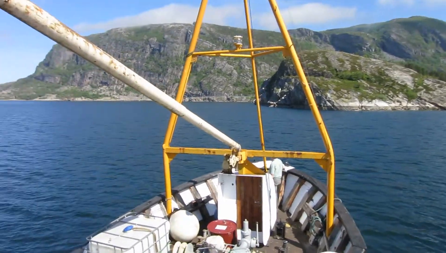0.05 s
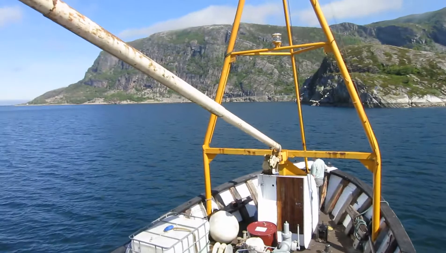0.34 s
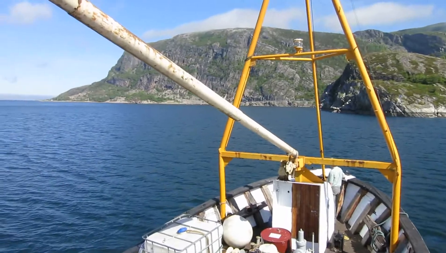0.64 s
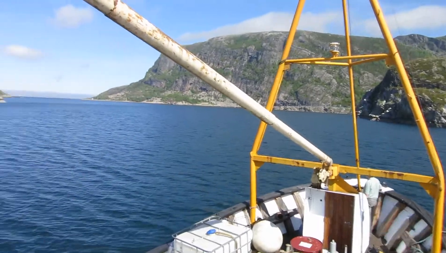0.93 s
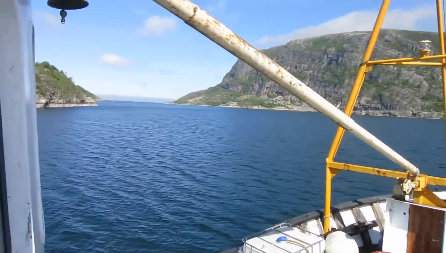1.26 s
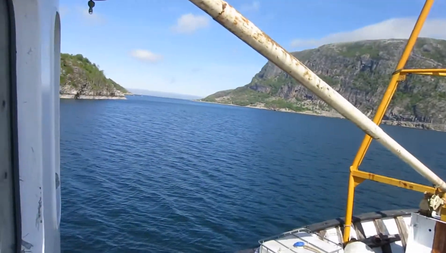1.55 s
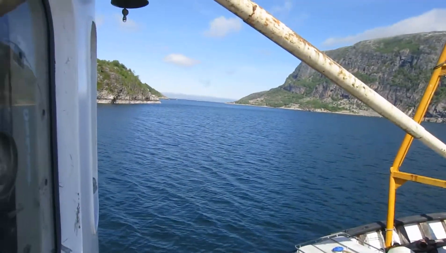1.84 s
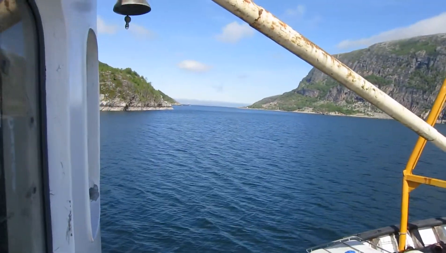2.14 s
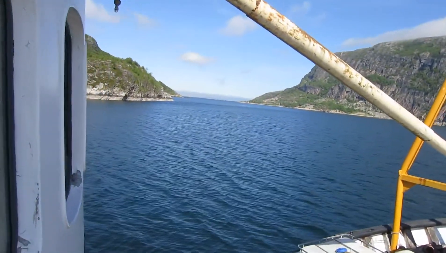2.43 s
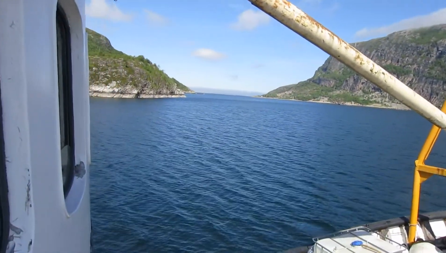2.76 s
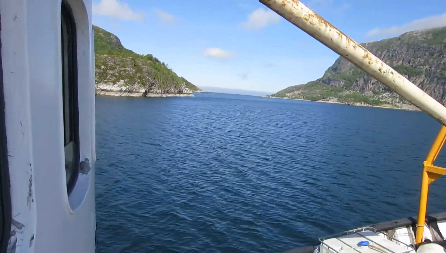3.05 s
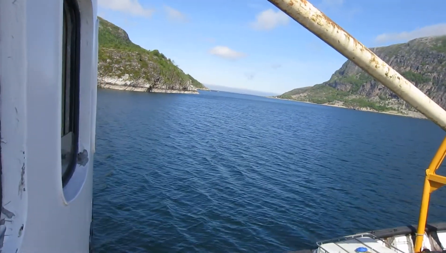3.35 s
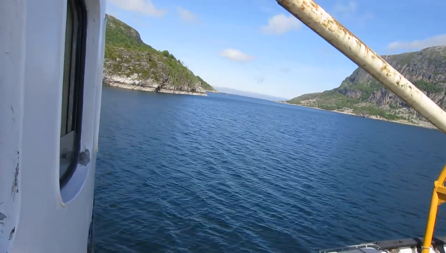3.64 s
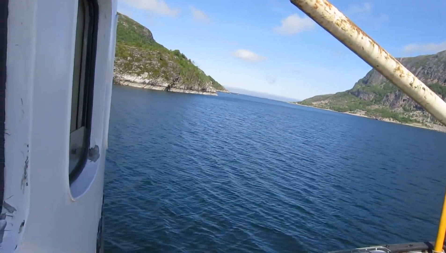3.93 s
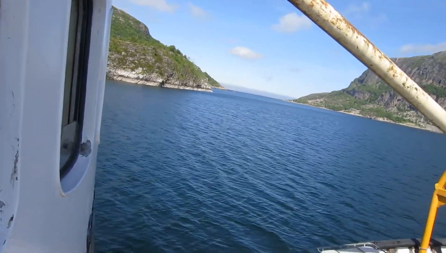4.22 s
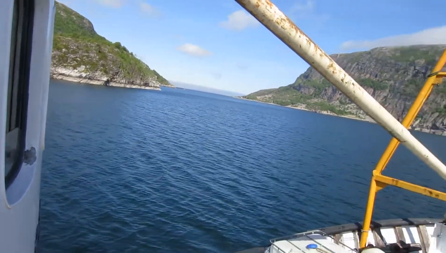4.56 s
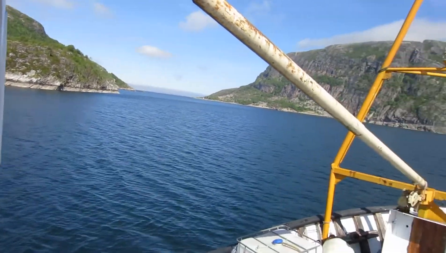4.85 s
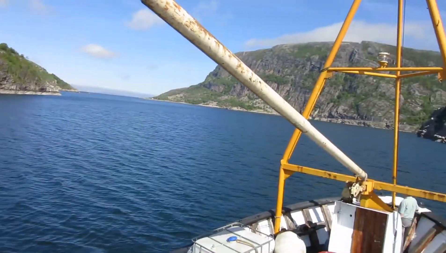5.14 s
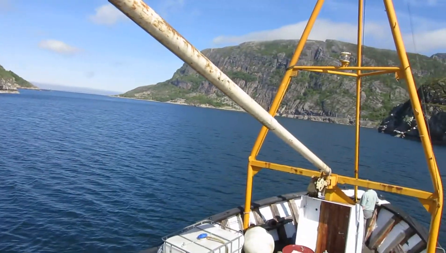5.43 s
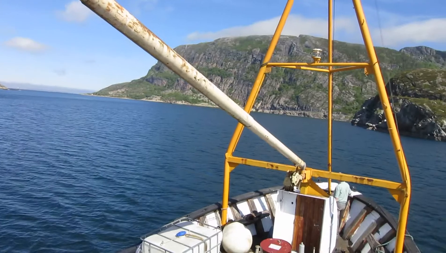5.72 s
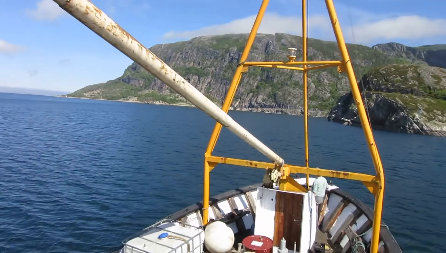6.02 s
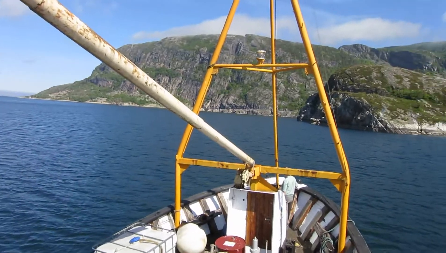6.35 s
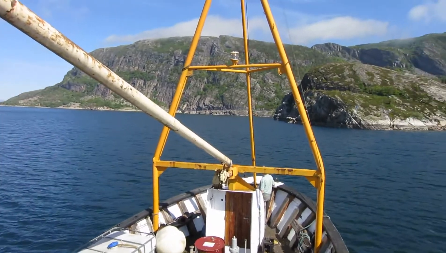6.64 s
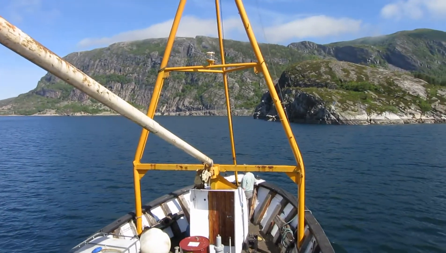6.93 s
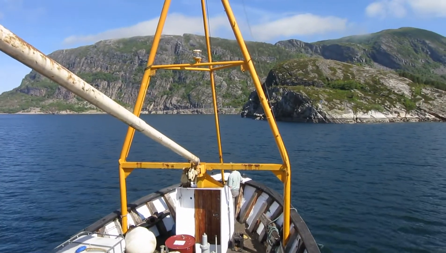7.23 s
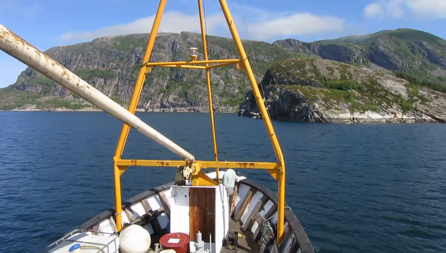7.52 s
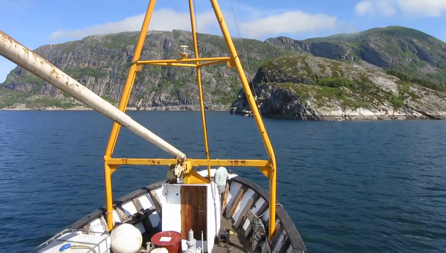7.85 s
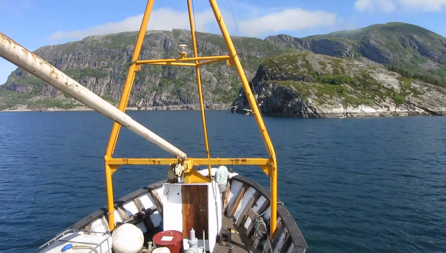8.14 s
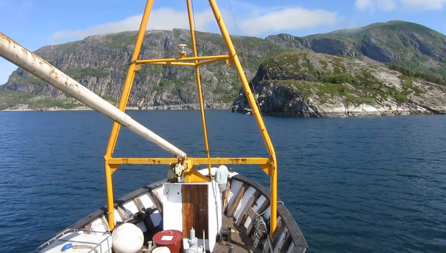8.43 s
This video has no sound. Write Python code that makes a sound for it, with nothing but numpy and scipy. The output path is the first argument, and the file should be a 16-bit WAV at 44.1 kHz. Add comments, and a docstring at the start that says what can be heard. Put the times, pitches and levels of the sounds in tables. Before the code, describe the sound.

A slow diesel engine throbs steadily through a wooden boat, with valve chirps and taps repeating about four times a second over a machine hum. Water hisses softly along the hull. It is heard from the deck on a stereo microphone whose right side is muffled. During the first second, fingers knock and creak on the casing, hardest at 0.8 seconds, followed by soft rubbing until about 2 seconds. The engine swells from 1.6 seconds and is loudest between 3 and 5.5, with the water surging near 3.8. From 5.6 to 7 seconds come sharp handling knocks, small clinks and a thump at 6.2, mostly on the right, and the engine and water drop suddenly in level. From 7 seconds to the end, near 8.7, dry engine taps stand out over the quieter throb, the hiss and a faint rumble of wind.

```python
"""A slow three-cylinder diesel throbs through the hull of a wooden boat under way on calm water.
Its valve gear chirps and taps over the hum of a faster auxiliary machine; the bow wave hisses.
Heard from the deck beside the wheelhouse, on a camera's stereo microphone in a light head wind.
The camera swings towards the wheelhouse and back. A finger covers and rubs the right port and knocks
on the casing; the deck sound ducks at three knocks. Near the end, dry engine taps stand out."""
import sys
import numpy as np
from scipy import signal
from scipy.fft import rfft, irfft, next_fast_len
from scipy.io import wavfile
from scipy.ndimage import uniform_filter1d

SR = 44100
rng = np.random.default_rng(int(sys.argv[2]) if len(sys.argv) > 2 else 0)


def persist_wave(psi):
    """Save psi, clipped to +-1, as 16-bit WAV."""
    counts = np.round(np.clip(psi, -1, 1) * 32767).astype(np.int16)
    wavfile.write(sys.argv[1], SR, np.atleast_2d(counts).T)


N = 382788
TIME = np.arange(N) / SR
CYCLE_S, CYCLE_START_S = .23123, 1.978  # one round of the diesel's three firings
IN_CYCLE = (TIME - CYCLE_START_S) % CYCLE_S


def amp(db):
    return 10 ** (np.asarray(db) / 20)

def unit_rms(x):
    return x / np.sqrt(np.mean(x ** 2) + 1e-20)

def over_time(points):
    return np.interp(TIME, *np.transpose(points))

def at_pitch(points, hz):
    pitches, values = np.transpose(points)
    return np.interp(np.log(hz + 1), np.log(pitches + 1), values)

def coloured(x, spectrum):
    """Filters x by rows of pitch_hz, gain_db."""
    size = next_fast_len(x.shape[-1])
    gain = amp(at_pitch(spectrum, np.fft.rfftfreq(size, 1 / SR)))
    return irfft(rfft(x, size) * gain, size)[..., :x.shape[-1]]

def drift(hz):
    """Random wander of unit size, changing about hz times a second."""
    return unit_rms(np.interp(TIME * hz, np.arange(2000), rng.standard_normal(2000)))

def bursts(per_s, decay_s):
    """Random pulses that start at once and die away."""
    starts = (rng.random(N) < per_s / SR) * rng.uniform(0.12, 1, N)
    return signal.lfilter([1], [1, -np.exp(-1 / (decay_s * SR))], starts)

def swells(rows):
    """One smooth rise and fall for each row."""
    return sum(amp(db) * np.exp(-((TIME - s) / half_s) ** 2) for s, db, half_s in rows)

def ports(x, lead_s):
    """The microphone's left port hears the sound a little earlier than the right."""
    return np.array([np.interp(TIME + lead_s, TIME, x), x])


# The diesel's firings, one row a cylinder: cycle_time_s, strength_db, decay_s
FIRINGS = [(.008, -2, 0.011), (.090, -7, 0.022), (.165, -5, 0.01)]

def throb(cycle_s, rest, rise_s=0.007):
    """Pressure over the cycle: each firing swells quickly and dies away above a steady rest."""
    pressure = 0
    for start_s, db, decay_s in FIRINGS:
        age = (cycle_s - start_s) % CYCLE_S
        pressure += amp(db) * (1 - np.exp(-age / rise_s)) * np.exp(-age / decay_s)
    return rest + pressure

# The hull's answer to the firings, heard on deck: pitch_hz, gain_db
HULL = [(15, -42), (45, -8.5), (70, -4), (110, -5.5), (180, 1.5), (235, -1), (300, -4), (332, -5.5),
        (365, -18.5), (560, -31.5), (660, -13.5), (760, -53), (1500, -53), (4000, -78)]

def diesel(level_db=-20.5, turbulent_db=-2.5, rest=0.26, uneven_db=0.4, apart_db=-10):
    """Firings shake the hull: much the same rumble every cycle, plus turbulence that never repeats."""
    cycle_s = np.arange(round(CYCLE_S * SR)) / SR
    harmonics = rfft(throb(cycle_s, rest) * rng.standard_normal(len(cycle_s)))
    one_cycle = unit_rms(irfft(harmonics / abs(harmonics), len(cycle_s)))
    repeated = np.interp(IN_CYCLE, cycle_s, one_cycle)
    turbulent = unit_rms(throb(IN_CYCLE, rest) * rng.standard_normal(N))
    blows = (repeated + amp(turbulent_db) * turbulent) * amp(uneven_db * drift(21))
    stereo = ports(blows, 0.000096) + amp(apart_db) * rng.standard_normal((2, N))
    return amp(level_db) * unit_rms(coloured(stereo, HULL))

# The diesel's rumble as the microphone swings to the wheelhouse and back: time_s, gain_db
WHEELHOUSE_SWING = [(0, -15.5), (.55, -11.5), (1.6, -11), (3.2, 1.5), (4.5, 1), (5.5, 1.5), (6.3, -2),
                    (7.1, -12.5), (8.68, -13)]

def nearness(share=1):
    """Gain near the wheelhouse; sounds with a smaller share of the swing carry further over the deck."""
    return amp(share * over_time(WHEELHOUSE_SWING))

def shaft_tones(rows, shaft_hz, waver_db, waver_turns, spread_turns):
    """Wavering multiples of a shaft speed; the less their phases spread, the more they pulse."""
    out = np.zeros(N)
    for multiple, db in rows:
        turns = multiple * shaft_hz * TIME + spread_turns * rng.random() + waver_turns * drift(2.45)
        out += amp(db + waver_db * drift(5)) * np.sin(2 * np.pi * turns)
    return out

# Harmonics of the auxiliary machine: speed_multiple, level_db
HUM_HARMONICS = [(2, -29), (3, -23), (4, -16), (5, -29), (6, -26), (7, -27), (8, -31.5), (9, -39),
                 (11, -37.5), (12, -41.5), (13, -46.5), (14, -51)]

def auxiliary_hum(shaft_hz=37.318):
    """The faster machine hums at multiples of its speed."""
    hum = shaft_tones(HUM_HARMONICS, shaft_hz, waver_db=1.0, waver_turns=0.027, spread_turns=0.49)
    return ports(hum, 0.00013)

# Harmonics of the crank: cycle_rate_multiple, level_db
CRANK_HARMONICS = [(6, -40), (9, -39.5), (12, -55), (15, -42), (18, -30), (29, -30), (47, -36.5)]

def crank_shake():
    """The turning crank shakes the boat steadily, in step with the engine cycle."""
    shake = shaft_tones(CRANK_HARMONICS, 1 / CYCLE_S, waver_db=4.0, waver_turns=0.016, spread_turns=0.77)
    return ports(shake, 0.000093)

# How far a ring follows the swing; higher ones fade less with distance: pitch_hz, share
SWING_SHARE = [(300, .9), (650, .68), (1300, .46)]

def cycle_rings(rows, uneven_db, scatter, slip_turns, rough, rise):
    """Short gliding tones at set angles of the cycle; rise is swell time as a share of fade time."""
    out = np.zeros(N)
    for peak_s, hz, db, fade_s, octaves_per_s in rows:
        cycles = (TIME - CYCLE_START_S - peak_s) / CYCLE_S
        nearest = np.round(cycles).astype(int)
        age = (cycles - nearest) * CYCLE_S
        strength, detune, slip = rng.standard_normal((64, 3))[nearest].T  # new in each cycle
        glided_s = age + np.log(2) * octaves_per_s * age ** 2 / 2
        turns = hz * (1 + scatter * detune) * glided_s + slip_turns * slip
        envelope = np.exp(-(age / np.where(age < 0, rise * fade_s, fade_s)) ** 2)
        gain = amp(db + uneven_db * strength) * nearness(at_pitch(SWING_SHARE, hz))
        out += gain * envelope * np.sin(2 * np.pi * turns)
    return ports(out * (1 + rough * drift(200)), 0.00015)

# Thuds of the hull: cycle_time_s, pitch_hz, level_db, fade_s, glide_octaves_per_s
THUDS = [(.007, 278, -15.5, 0.0055, -5), (.017, 175, -11.5, 0.0055, -17), (.036, 170, -25.5, .006, 2),
         (.096, 112, -19, 0.0065, 0), (.108, 210, -13, .006, -7), (.171, 252, -13.5, 0.0082, -5),
         (.188, 225, -15, 0.012, 3.5)]

def hull_thuds():
    """The wooden hull rings low and briefly with each firing."""
    return cycle_rings(THUDS, uneven_db=0, scatter=0.0077, slip_turns=0.083, rough=0.082, rise=0.81)

# Squeaks of the valve gear: cycle_time_s, pitch_hz, level_db, fade_s, glide_octaves_per_s
SQUEAKS = [(-.003, 644, -22.2, .015, -4.5), (-.002, 1326, -26, .012, 0), (.016, 1335, -38, .014, 0),
           (.001, 1620, -41, .015, 2), (.008, 955, -38, .014, 0), (.085, 1335, -37, .010, 0),
           (.155, 1335, -41, .008, 0), (.159, 651, -25, .015, 1), (.05, 660, -37, .022, 0)]

def valve_squeaks(right_db=-1.4):
    """The valve gear chirps in every cycle, slightly left of centre."""
    chirps = cycle_rings(SQUEAKS, uneven_db=.35, scatter=.01, slip_turns=.25, rough=.2, rise=.45)
    return chirps * amp([[0], [right_db]])

# The engine's rattling metal, heard on deck: pitch_hz, gain_db
CLATTER_COLOUR = [(200, -4), (420, 3), (650, 3.5), (800, -6.5), (1200, -2), (1700, -7.5), (2300, -12),
                  (3200, -26.5), (5000, -35), (12000, -40.5)]

def clatter(level_db=-34, flicker_db=1.5, apart_db=-6):
    """Dense rattle of the engine's metal parts, pulsing with the firings."""
    noise = ports(rng.standard_normal(N), 0.0002) + amp(apart_db) * rng.standard_normal((2, N))
    rattle = noise * throb(IN_CYCLE, rest=1.0) * amp(flicker_db * drift(120))
    return amp(level_db) * unit_rms(coloured(rattle, CLATTER_COLOUR))

# Dry taps of the valve gear: cycle_time_s, level_db, half_length_s, centre_hz
TAPS = [(-.007, -29, .0035, 1100), (.007, -34, .003, 1000), (.044, -38, .005, 1300), (.12, -39, .004, 2300)]

def valve_taps(uneven_db=1):
    """Each tap of the valve gear is a short, dull clack about two octaves wide."""
    out = np.zeros(N)
    for peak_s, db, half_s, hz in TAPS:
        age = (IN_CYCLE - peak_s + CYCLE_S / 2) % CYCLE_S - CYCLE_S / 2
        band = [(hz / 8, -40), (hz / 2, -4), (hz, 0), (2 * hz, -6), (4 * hz, -32), (8 * hz, -60)]
        out += amp(db) * np.exp(-(age / half_s) ** 2) * unit_rms(coloured(rng.standard_normal(N), band))
    return ports(out * amp(uneven_db * drift(4.6)), 0.00022)

# Foam along the hull, heard from the deck: pitch_hz, gain_db
FOAM_COLOUR = [(30, -58), (150, 7.5), (500, 1.5), (1100, 1), (2200, -3), (3300, -8), (4900, -10.5),
               (5800, -14.5), (10000, -16.5), (12000, -20.5), (14000, -33), (15300, -38)]
# The foam's fizz above 4 kHz: time_s, gain_db
FIZZ = [(0, -0.5), (.7, 0), (1.05, -4), (1.5, -6), (1.8, -1), (2.1, -3.5), (5.5, -1.5), (7.5, -0.5),
        (7.58, 2.5), (7.88, 4), (8.03, -1.5), (8.68, 2)]
# Surges added to the steady hiss, relative to it: peak_s, level_db, half_length_s
SURGES = [(3.75, -6, 0.87), (6.7, -14, 0.33)]

def bow_wave(level_db=-37.5, waver_db=0.03, flicker_db=2, drops_db=-10, drops_per_s=120, apart_db=1):
    """Foam hisses along the hull, with single drops and short spits of spray in it."""
    drops = (rng.random(N) < drops_per_s / SR) * rng.standard_normal(N)
    hiss = rng.standard_normal(N) * amp(flicker_db * drift(90)) + amp(drops_db) * unit_rms(drops)
    stereo = ports(hiss, 0.00015) + amp(apart_db) * rng.standard_normal((2, N))
    foam = unit_rms(coloured(stereo, FOAM_COLOUR))
    fizz = coloured(foam, [(2500, -30), (4000, -5), (6500, 0)])
    spray = 0.51 * bursts(per_s=14, decay_s=0.015)
    foam += fizz * (amp(over_time(FIZZ)) - 1 + spray)
    return amp(level_db + waver_db * drift(5.5)) * (1 + swells(SURGES)) * foam

# Head wind right on the microphone: pitch_hz, gain_db
WIND_COLOUR = [(15, -19), (35, -23), (80, -4), (110, 4), (160, -4), (300, -12), (800, -44), (3000, -92)]
# Its gusts: peak_s, level_db, half_length_s
GUSTS = [(0, -39, 0.53), (6.25, -31, 0.3), (8.35, -32, 0.8)]

def head_wind(steady_db=-47, buffet_db=3.0, apart_db=-1):
    """A low, lumpy rumble of air moving past the camera, partly its own at each port."""
    air = rng.standard_normal(N) + amp(apart_db) * rng.standard_normal((2, N))
    strength = (amp(steady_db) + swells(GUSTS)) * amp(buffet_db * drift(13))
    return strength * unit_rms(coloured(air, WIND_COLOUR))

# The covered right port against the open left: pitch_hz, gain_db
COVERED_PORT = [(100, -0.47), (300, -1), (700, -1), (1300, -2.5), (2400, -6), (4300, -11.5), (8000, -18),
                (15000, -25)]

def muffle_right(sound):
    """The finger keeps treble out of the right port throughout."""
    return np.array([sound[0], coloured(sound[1], COVERED_PORT)])

# The casing around the microphone, colouring creaks and knocks: pitch_hz, gain_db
CASING = [(100, 22), (300, 3), (550, 3), (950, -1.5), (1600, -5), (2500, -15), (3900, -29), (6000, -31),
          (10000, -47.5), (15000, -58)]
# Bouts in which the grip shifts: peak_s, level_db, half_length_s
GRIP_SHIFTS = [(.2, -34.5, 0.54), (3, -36.5, 0.4), (5.7, -38.5, 0.72), (8.0, -47.5, 1)]

def grip_creaks(per_s=16, slip_s=0.009, left_db=-14):
    """Small slips of the grip tick in the casing at random, mostly at the right port."""
    ticks = coloured(bursts(per_s, slip_s) * rng.standard_normal(N), CASING)
    ticks = coloured(ticks, [(150, -17.5), (500, 4), (2500, -15.5), (5000, -1)])  # light slips: less bass
    return ports(swells(GRIP_SHIFTS) * unit_rms(ticks), 0.00047) * amp([[left_db], [0]])

# Dry knocks: a finger on the casing, plus late engine taps, roughly one per cycle:
# time_s, level_db, half_length_s, treble_db, lowest_ring_hz
KNOCKS = [(0.026, -19.5, 0.0023, -2, 450), (.188, -24.5, 0.0059, 1, 500), (0.316, -18.5, 0.0019, -3, 740),
          (.337, -27, .002, -6, 700), (0.443, -22, 0.002, -10, 760), (.521, -19.5, 0.0037, -7, 690),
          (.558, -17.5, 0.003, -8, 646), (.613, -18.5, 0.0027, -18, 614), (0.744, -25, 0.0023, 0, 500),
          (0.761, -10, 0.0085, 2, 218), (0.794, -27.5, 0.009, 13, 453), (2.05, -24, 0.0024, 5, 700),
          (5.691, -17, 0.0028, 1, 730), (5.813, -16.5, 0.0036, 9, 593), (5.925, -22, 0.02, -1.5, 198),
          (6.2292, -12.5, 0.0022, 9, 260), (6.373, -16.5, 0.012, -4.5, 212),
          (6.479, -15, 0.0053, -0.5, 271), (6.535, -18, 0.0027, -1, 260), (6.545, -20, 0.009, -2.5, 228),
          (6.957, -31.5, 0.014, 4, 300), (7.027, -16, 0.0005, -3, 278), (7.103, -28.5, 0.001, -10, 326),
          (7.202, -28, 0.0018, -7, 620), (7.292, -29, .0018, -2, 590), (7.42, -33, 0.0015, 3, 1100),
          (7.521, -33, 0.0024, -9, 497), (7.598, -29.5, 0.0017, -6, 500), (7.706, -28.5, 0.0019, -10, 297),
          (7.905, -32.5, 0.0013, 0, 800), (7.978, -23.5, 0.0012, 0, 740), (8.137, -27, 0.0013, 1, 750),
          (8.213, -26.5, 0.002, -1, 690), (8.368, -29, 0.0017, 0, 400), (8.445, -26, 0.0015, -5, 646),
          (8.522, -29, 0.0017, -3, 653), (8.597, -26, 0.0036, 1, 397)]

def dry_knocks(left_db=-9, apart=0.62, ring_q=1.97, lead_s=0.00028):
    """Each knock is a quick burst of noise with its own lowest ring, loudest at the right port."""
    out = np.zeros((2, N))
    t = np.arange(-2048, 2048) / SR
    hz = np.fft.rfftfreq(len(t), 1 / SR)
    for time_s, db, half_s, treble_db, ring_hz in KNOCKS:
        envelope = np.exp(-np.logaddexp(-3 * (t / half_s + 0.37), t / half_s + 0.31))  # sharp onset
        burst = rng.standard_normal((2, len(t))) * envelope
        burst[0] = apart * burst[0] + np.interp(t + lead_s, t, burst[1])
        force = rfft(burst)
        force /= np.sqrt(uniform_filter1d(abs(force) ** 2, size=41, axis=1))  # excites all pitches alike
        ratio = 1j * hz / ring_hz
        resonant_highpass = ratio ** 2 / (ratio ** 2 + ratio / ring_q + 1)
        colour_db = at_pitch(CASING, hz) + at_pitch([(900, 0.0067), (3000, treble_db)], hz)
        knock = irfft(force * resonant_highpass * amp(colour_db)) * amp([[left_db], [0]])
        knock *= amp(db) * np.linalg.norm(envelope / envelope.max()) / np.linalg.norm(knock[1])
        at = round(time_s * SR) + np.arange(len(t)) - len(t) // 2
        inside = (at >= 0) & (at < N)
        out[:, at[inside]] += knock[:, inside]
    return out

# Finger strokes right on the microphone: peak_s, level_db, half_length_s
RUBS = [(.73, -44.5, 0.034), (.89, -48.5, 0.14), (1.3, -54, .16), (1.57, -50, .06), (1.675, -45.5, 0.059),
        (1.79, -44.5, 0.081), (1.87, -45, .025), (5.925, -49, 0.019), (6.92, -50.5, 0.024)]
# Skin on plastic: pitch_hz, gain_db
SKIN_COLOUR = [(300, -23), (1800, 15), (4500, 7.5), (9000, -2), (12000, -15), (15000, -28)]

def finger_rubs(left_db=-14, flicker_db=2.1):
    """Soft hiss of skin sliding across the right port."""
    friction = rng.standard_normal((2, N)) * amp(flicker_db * drift(200))
    return swells(RUBS) * unit_rms(coloured(friction, SKIN_COLOUR)) * amp([[left_db], [0]])

# Dips of the deck sound at three hard knocks: start_s, drop_db, recovery_s
DIPS = [(0.764, 9, 0.58), (5.681, 10, 1.15), (6.225, 11.5, 2.9)]

def level_dips(fall_s=0.022):
    """A gain that drops quickly and creeps back."""
    gain_db = np.zeros(N)
    for start_s, drop_db, recovery_s in DIPS:
        age = np.maximum(TIME - start_s, 0)
        gain_db -= drop_db * np.minimum(age / fall_s, 1) * np.exp(-age / recovery_s)
    return amp(gain_db)

# Tiny snaps, mostly to the left: start_s, relative_db, left_minus_right_db, decay_s
SNAPS = [(0.8599, -40, 0.5, 0.0069), (1.0156, -46, 3, 0.008), (1.5818, -44, 11.0, 0.008),
         (1.955, -44, 6, 0.008), (2.2483, -44, 14, 0.0086), (4.4194, -44, 17.5, 0.008),
         (5.3294, -42, 20, 0.0066), (6.9541, -43, 2.0, 0.008), (7.4175, -46, 5, 0.008),
         (7.5587, -48, 17.0, 0.0069)]
# Their bright colour: pitch_hz, gain_db
SNAP_COLOUR = [(1000, -25), (3500, 0), (6000, 1), (10500, -5), (13000, -10), (15000, -22)]

def snaps(level_db=-5, rise_s=0.00077):
    """Tiny bright snaps of hiss that start at once and fade."""
    envelope = np.zeros((2, N))
    for start_s, db, pan_db, decay_s in SNAPS:
        age = np.maximum(TIME - start_s, 0)
        port_gains = amp([[db + pan_db / 2], [db - pan_db / 2]])
        envelope += port_gains * (1 - np.exp(-age / rise_s)) * np.exp(-age / decay_s)
    return amp(level_db) * envelope * unit_rms(coloured(rng.standard_normal((2, N)), SNAP_COLOUR))

# Modes of small hard parts, towards the right port: start_s, pitch_hz, level_db, t60_s
CLINK_MODES = [(5.5505, 1230, -7, .021), (5.5505, 1520, -14, .027), (5.5505, 2200, -16, .024),
               (5.5505, 2990, -22, .03), (5.5505, 4350, -31, .014), (5.812, 544, -14, .04),
               (5.812, 900, -15, .035), (5.812, 1870, -22, .025), (5.812, 3390, -31, .02),
               (5.967, 1520, -33, .06), (6.133, 1330, -25, .03), (6.133, 1700, -29, .035),
               (6.228, 2100, -12, .014), (6.228, 2550, -14, .012), (6.228, 2950, -13.5, .014),
               (6.955, 1750, -26, .035)]

def clinks(left_db=-6, contact_s=0.0009):
    """Small hard parts ring on briefly after sharp taps."""
    out = np.zeros(N)
    for start_s, hz, db, t60_s in CLINK_MODES:
        age = np.clip(TIME - start_s, 0, 5 * t60_s)
        envelope = amp(db - 60 * age / t60_s) * (1 - np.exp(-age / contact_s))
        out += envelope * np.sin(2 * np.pi * hz * age)
    return ports(out, 0.00018) * amp([[left_db], [0]])

# The fingertip lands flat on the right port: start_s, level_db, pitch_hz, t60_s, signed_left_share
THUMPS = [(6.2274, -2, 164, 0.022, -0.34), (7.027, -13.5, 121, 0.025, 0.45)]

def port_thumps():
    """The fingertip slaps the right port shut: one push of air and a few dying swings."""
    out = np.zeros((2, N))
    for start_s, db, hz, t60_s, left_share in THUMPS:
        age = np.clip(TIME - start_s, 0, 5 * t60_s)
        out += np.outer([left_share, 1], amp(db - 60 * age / t60_s) * np.sin(2 * np.pi * hz * age))
    return out


def scene():
    """Engine, water and wind reach a half-covered microphone; knocks and handling noise sit on top."""
    engine = auxiliary_hum() * nearness(0.96) + crank_shake() * nearness(0.5)
    engine += hull_thuds() + valve_squeaks() + diesel() * nearness()
    engine += clatter() * nearness(0.81) + valve_taps() * nearness(0.31)
    deck = (engine + bow_wave() + head_wind()) * level_dips()
    foreground = dry_knocks() + port_thumps() + grip_creaks() + clinks() + finger_rubs() + snaps()
    return muffle_right(deck) + foreground

def record(dry):
    """The recorder's band limit."""
    edge_hz = 15300
    lowpass = signal.firwin(511, edge_hz, window=("kaiser", 9), fs=SR)
    return signal.oaconvolve(dry, lowpass[None], "same")


dry = scene()
out = record(dry)
persist_wave(out)
```